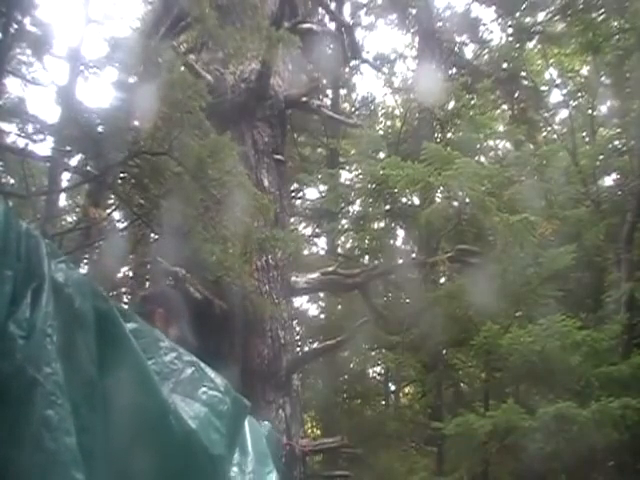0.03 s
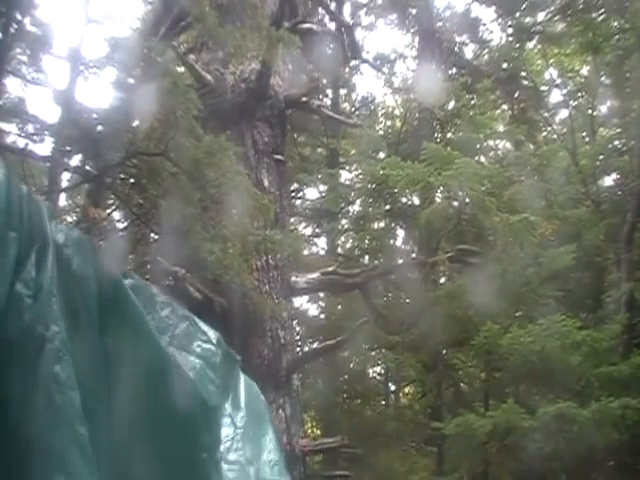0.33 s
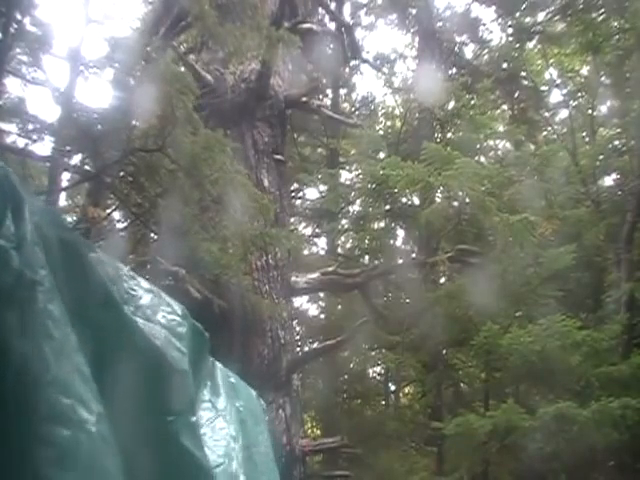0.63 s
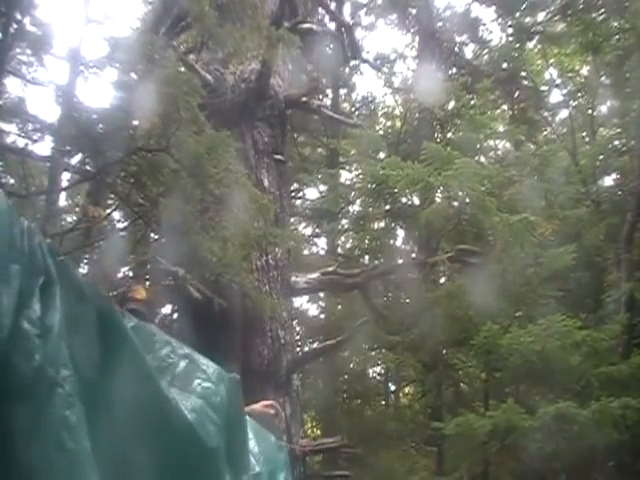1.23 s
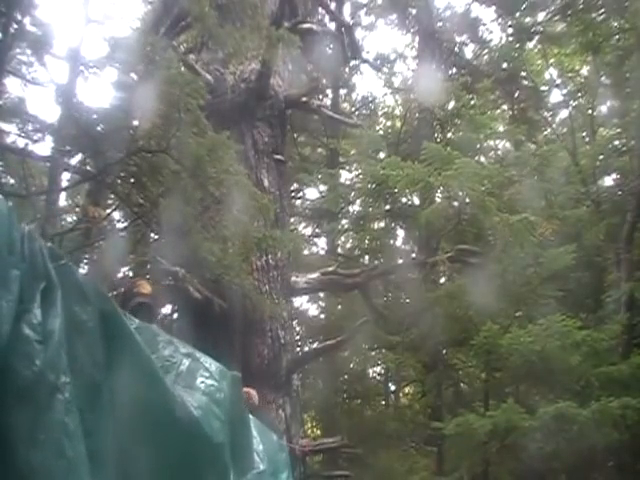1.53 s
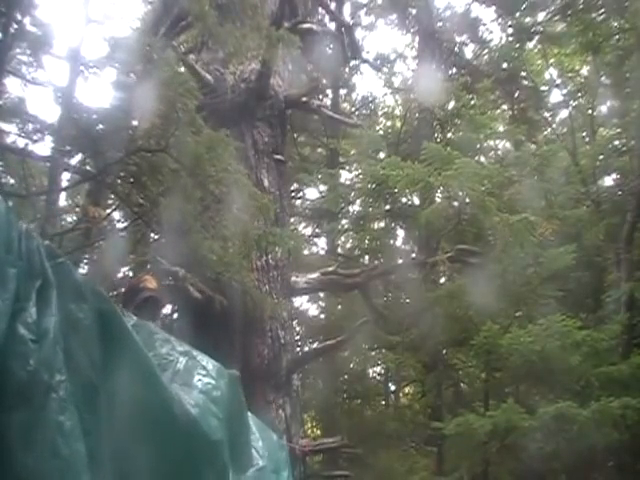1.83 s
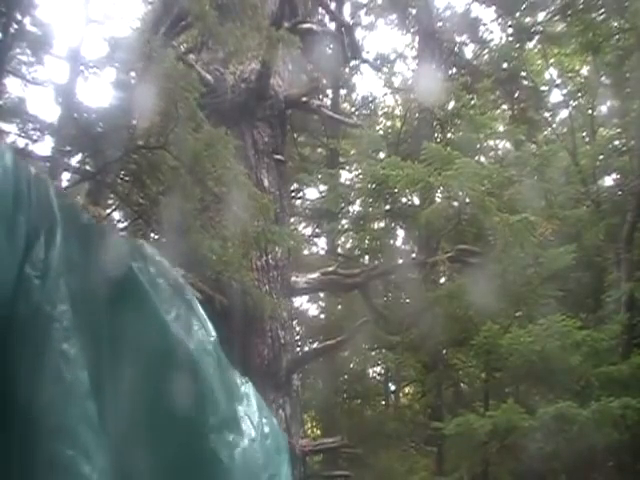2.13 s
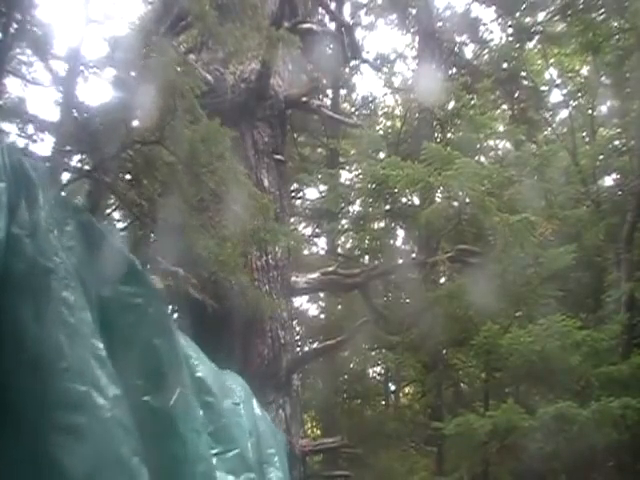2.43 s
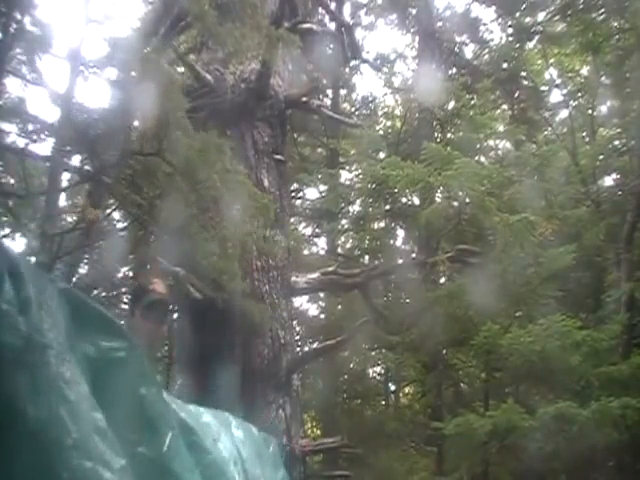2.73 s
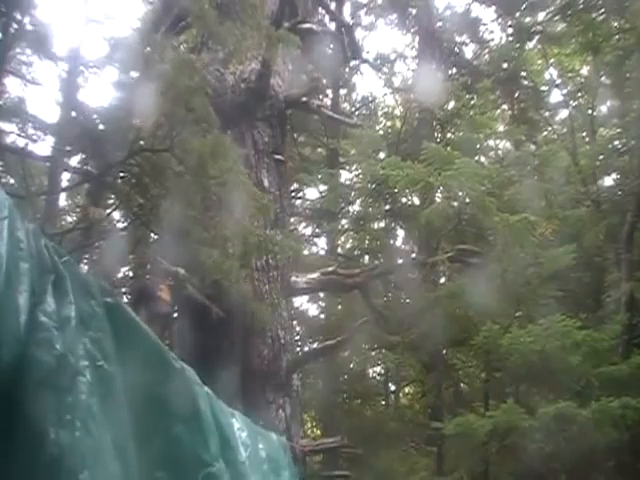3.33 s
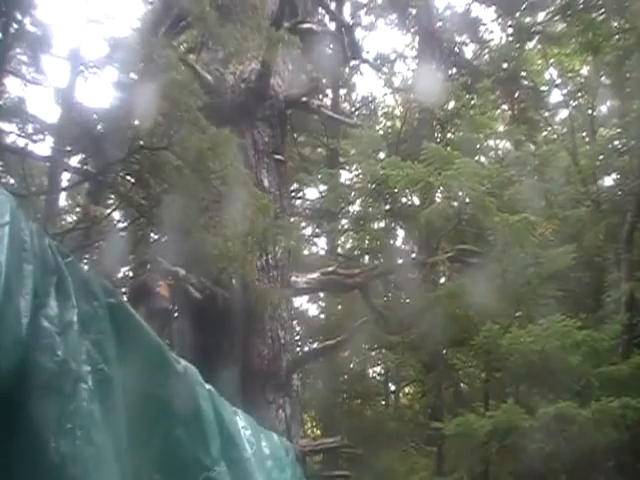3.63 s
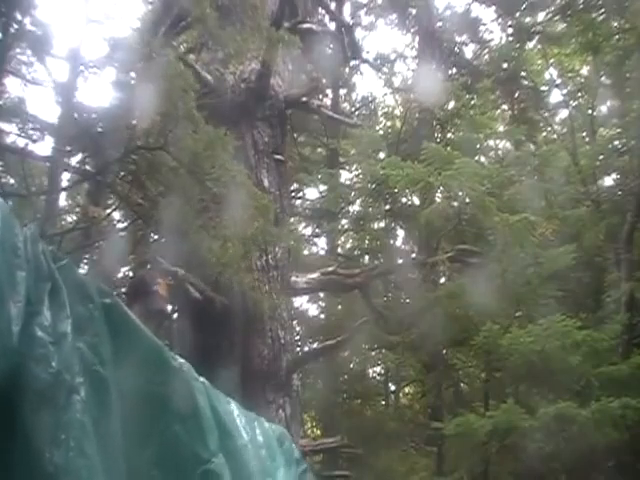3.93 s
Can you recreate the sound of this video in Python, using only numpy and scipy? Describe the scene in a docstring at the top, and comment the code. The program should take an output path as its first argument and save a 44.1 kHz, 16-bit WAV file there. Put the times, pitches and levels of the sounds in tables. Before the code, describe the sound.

A plastic tarp rustles and crinkles up close, with soft rain in the trees.

```python
"""A plastic tarp is pulled and shaken near the microphone in a wet forest, rain soft in the trees.
A drop taps the camera, then the sheet rubs and buckles in two swells, single folds snapping as they give.
Around 1.5 s the tarp rests and a drop thuds on the camera's shell. Two more swells follow from 2 s.
They die away after 3.2 s, the rubbing sheet squeaks once, another drop lands hard,
and the tarp stirs again at the very end."""
import sys
import numpy as np
from scipy import signal
from scipy.fft import rfft, irfft, next_fast_len
from scipy.io import wavfile
from scipy.ndimage import map_coordinates

SR = 44100
rng = np.random.default_rng(int(sys.argv[2]) if len(sys.argv) > 2 else 0)


def store_pcm(level_fs):
    """Save levels as 16-bit WAV."""
    pcm = np.round(np.clip(level_fs, -1, 1) * 32767).astype(np.int16)
    wavfile.write(sys.argv[1], SR, np.atleast_2d(pcm).T)


N = 176400

# Rain far off in the trees. Each row: frequency in Hz, relative level in dB.
RAIN_SPECTRUM = [(25, -26), (55, -20), (80, -8.5), (110, -12.5), (165, 1), (200, -6.5), (400, -3.5),
                 (850, 2), (1500, -10.5), (3000, -38), (5500, -43), (9500, -37), (16500, -39)]
# Drops on and beside the camera. Each row: start in seconds, then click, thud, ping and splash in dB.
CLOSE_DROPS = [(0.2401, -6, -26, -4.5, -34), (0.7875, -34, -50, -15.5, -47), (1.0949, -20, -45, -12, -25),
               (1.4701, -27, -55, -26, -35.5), (1.5721, -9, -11.5, -44, -21.5),
               (2.1964, -20, -47, -9.5, -40), (2.7711, -15, -47, -24, -38), (2.9337, -16, -45, -17, -43),
               (3.4157, -30, -55, -25, -42), (3.7018, -4.5, -22.5, -14, -16), (3.906, -31, -52, -18, -32)]
# The shell's low thud and high ping. Each row: frequency in Hz, level in dB, 60 dB decay in seconds.
THUD_MODES = [(280, -12, 0.011), (608, -1, 0.016), (760, 5.5, 0.0055), (1520, -5.5, 0.017),
              (1890, -3, 0.0091)]
PING_MODES = [(7100, -2, .004), (9200, -4, .005), (9620, -4.5, 0.01), (11900, 2, 0.001)]
# A close drop's impact and its splash. Each row: frequency in Hz, relative level in dB.
CLICK_SPECTRUM = [(60, -22), (300, 17), (2000, 15), (5000, 3), (10000, 7), (14000, -13), (16500, -26)]
SPLASH_SPECTRUM = [(60, -30), (300, 6), (2000, 1.5), (4500, 4.5), (6000, -0.5), (10000, -1), (13000, -7),
                   (16000, -27)]
# How hard the tarp moves. Each row: time in seconds, rustle level in dB, hiss level in dB.
TARP_MOTION = [(0.0, -32.5, -43), (0.04, -36, -44), (0.09, -31.5, -39), (0.29, -32, -36.5),
               (0.35, -25, -33), (0.48, -25, -31.0), (0.6, -27.5, -33.3), (0.67, -30.5, -34),
               (0.77, -29.5, -35.3), (0.86, -24.5, -33), (0.99, -26, -30.1), (1.08, -31, -33),
               (1.22, -29.5, -40), (1.37, -34.5, -45), (1.49, -44, -51.4), (1.55, -41, -50.5),
               (1.75, -50, -52.7), (1.848, -29.5, -40), (1.91, -37.5, -43), (1.97, -32, -41),
               (2.05, -24.5, -29.5), (2.15, -23.5, -28.5), (2.27, -27.5, -29.5), (2.35, -32, -35.5),
               (2.45, -33, -40.5), (2.55, -30.5, -36), (2.63, -32.5, -36.3), (2.74, -27.5, -32),
               (2.87, -25.5, -32.6), (2.98, -28.5, -36.5), (3.12, -28, -36.5), (3.25, -38.5, -43.5),
               (3.38, -37.5, -50), (3.45, -46, -52.5), (3.62, -44.5, -46.3), (3.83, -46.5, -53),
               (3.91, -35.5, -47), (4.0, -31.8, -36)]
# The sounds of the plastic, heard close. Each row: frequency in Hz, relative level in dB.
CRINKLE_SPECTRUM = [(500, -34), (3000, -6), (6000, -12), (9600, 5), (12000, -2), (14500, -12), (16000, -13)]
RUSTLE_SPECTRUM = [(30, -49), (80, -30), (150, -17.5), (300, -4), (700, 1), (1100, -0.5), (1800, 1),
                   (2500, -2), (3600, -3.5), (4400, -12), (6000, -13.5), (10000, -12), (16000, -66)]
HISS_SPECTRUM = [(1500, -54), (4000, 3), (5500, -6.5), (6800, 1), (8500, -1.5), (9650, 2.5), (10600, -3.5),
                 (12000, -7), (14500, -12), (16500, -30)]
CRACKLE_SPECTRUM = [(60, -52), (300, -19), (900, 0.5), (2000, 0), (3500, 0.5), (5200, -10.5), (7000, -7),
                    (9700, -5), (12000, -14.5), (16000, -45)]
# Folds that snap, and one thin high squeak of the sheet rubbing at 3.52 s. Each row: start in seconds,
# level in dB, rise in seconds, 60 dB decay in seconds, resonant pitch in Hz, its lift in dB.
FOLDS_AND_SQUEAK = [(0.057, -25.5, 0.0027, 0.059, 1640, 7), (.131, -21, 0.00059, 0.025, 1700, 12),
                    (.1635, -25, 0.0005, 0.067, 1340, 6), (.58, -25.5, .004, 0.073, 2000, 4),
                    (0.785, -28, .002, 0.068, 3000, -1), (.844, -24, 0.0011, 0.048, 8800, 11),
                    (0.9872, -15.5, 0.0045, 0.033, 3800, 7), (.992, -18.5, 0.0012, 0.1, 600, 13),
                    (1.157, -21.5, .001, 0.019, 3670, 10), (1.218, -22.5, 0.00091, .025, 2000, 1),
                    (1.291, -26, 0.0015, 0.015, 3500, -10), (1.313, -30, 0.0034, 0.022, 990, 11),
                    (1.4434, -33, 0.00036, 0.012, 1770, 10), (1.6495, -25, 0.00012, 0.047, 3400, 5.5),
                    (1.721, -37, 0.0036, 0.043, 2390, 10), (1.773, -32.5, .001, 0.11, 1330, 17),
                    (1.852, -28, .002, 0.063, 2400, 10), (1.866, -19, 0.0037, .03, 1880, 11),
                    (1.928, -27, 0.0037, 0.083, 880, 12), (2.248, -17.5, .001, 0.029, 1120, 11),
                    (2.541, -22, 0.0013, .04, 7060, 4.5), (2.607, -25, 0.0027, 0.032, 1800, -11),
                    (2.706, -24, 0.0021, 0.13, 2000, 2), (2.844, -21.5, 0.013, 0.14, 1160, 11.5),
                    (2.77, -25, .001, .014, 13500, 26), (2.945, -29, .001, .012, 13500, 24),
                    (3.021, -25, 0.0024, 0.042, 2500, -15), (3.089, -22, 0.0038, 0.027, 1800, -10),
                    (3.13, -32, .001, .04, 13000, 17), (3.187, -35, .001, .015, 12000, 20),
                    (3.215, -27, 0.00071, 0.048, 12500, 13), (3.333, -23.5, 0.0023, 0.051, 2350, 2.5),
                    (3.341, -34, 0.0017, 0.036, 12000, 14), (3.369, -41, 0.0043, 0.045, 1300, 20),
                    (3.519, -43, 0.021, .06, 9400, 24), (3.602, -38, 0.0026, 0.033, 2000, 19),
                    (3.676, -39, 0.00077, 0.029, 4000, 7), (3.798, -33, 0.0014, 0.027, 1910, 11),
                    (3.887, -25, 0.001, 0.041, 1960, 10), (3.906, -32, .001, 0.051, 11100, 26),
                    (3.966, -25.5, 0.0016, 0.033, 3000, -10), (3.987, -24.5, .003, 0.029, 2000, 2)]


def amp(db):
    """Decibels to gain."""
    return 10 ** (np.asarray(db) / 20)


def unit(x):
    """Scale to rms 1."""
    return x / np.sqrt(np.mean(x ** 2) + 1e-20)


def colour(points, peak_hz=1000, peak_db=0, width_oct=0.23, size=2048):
    """Minimum-phase impulse response of energy 1 for a spectrum, with an optional resonance."""
    point_hz, point_db = np.transpose(points)
    hz = np.fft.rfftfreq(size, 1 / SR) + 1
    db = np.interp(np.log(hz), np.log(point_hz), point_db)
    db += peak_db * np.exp(-.5 * (np.log2(hz / peak_hz) / width_oct) ** 2)
    cepstrum = irfft(np.log(amp(db)))
    cepstrum[1:size // 2] *= 2
    cepstrum[size // 2 + 1:] = 0
    response = irfft(np.exp(rfft(cepstrum)))
    return response / np.linalg.norm(response)


def through(x, response):
    """Convolve and keep the length."""
    return signal.fftconvolve(x, response)[:len(x)]


def add(track, start, sound):
    """Mix a sound into a track at a start in seconds."""
    part = track[int(start * SR):][:len(sound)]
    part += sound[:len(part)]


def wobble(per_s):
    """A smooth random curve with per_s knots a second."""
    return map_coordinates(rng.standard_normal(4096), [np.arange(N) * per_s / SR], mode="wrap")


def impulses(per_s, spread_db, n=N):
    """Randomly timed impulses of scattered size and either sign, rms 1."""
    size = amp(spread_db * np.clip(rng.standard_normal(n), -2, 2)) * rng.choice([-1, 1], n)
    return unit(size * (rng.random(n) < per_s / SR))


def burst(t, rise, t60):
    """Straight rise, then exponential decay."""
    return np.minimum(t / rise, 1) * amp(-60 * np.maximum(t - rise, 0) / t60)


def ring(modes, t):
    """Damped modes struck together, alternating in sign."""
    return sum(amp(db - 60 * t / t60) * np.cos(2 * np.pi * hz * t) * (-1) ** k
               for k, (hz, db, t60) in enumerate(modes))


def distant_rain(level_db=-48):
    """Countless drops on far leaves reach the microphone as a soft wash."""
    gain = amp(level_db + 0.24 * wobble(12))
    return gain * through(impulses(per_s=4000, spread_db=1), colour(RAIN_SPECTRUM))


def trunk_scatter(near, level_db=-22.5):
    """The trunks around the microphone return a faint, short scatter of the near sounds."""
    t = np.arange(SR // 2) / SR
    tail = rng.standard_normal(len(t)) * burst(t, rise=0.0047, t60=0.086)
    return amp(level_db) * through(near, tail / np.linalg.norm(tail))


def close_drops(click_t60=0.001, low_cut_hz=196):
    """Right at the microphone, each drop clicks, rings the camera's shell and splashes."""
    out, t = np.zeros(N), np.arange(SR // 16) / SR
    for start, click_db, thud_db, ping_db, splash_db in CLOSE_DROPS:
        impact = rng.choice([-1, 1], len(t)) * amp(-60 * t / click_t60)
        click = amp(click_db) * through(impact / np.linalg.norm(impact), colour(CLICK_SPECTRUM))
        shell = amp(thud_db) * ring(THUD_MODES, t) + amp(ping_db) * ring(PING_MODES, t)
        spray = rng.standard_normal(len(t)) * burst(t, rise=0.00027, t60=0.021)
        splash = amp(splash_db) * through(spray, colour(SPLASH_SPECTRUM))
        add(out, start, click + shell + splash)
    # The small shell gives no bass.
    return signal.sosfilt(signal.butter(2, low_cut_hz, "highpass", fs=SR, output="sos"), out)


def tarp_motion():
    """The rustle and hiss levels of the moving tarp at every sample, in dB."""
    times, *levels = np.transpose(TARP_MOTION)
    return [np.interp(np.arange(N) / SR, times, db) for db in levels]


def coating_crinkles(t60=0.005):
    """The tarp's coating crinkles in sparse, bright ticks that follow the hiss of the sheet."""
    _, hiss_db = tarp_motion()
    t = np.arange(SR // 100) / SR
    power = through(impulses(per_s=140, spread_db=3.5) ** 2, amp(-60 * t / t60) ** 2)
    ticks = np.sqrt(np.abs(power)) * rng.standard_normal(N)
    return unit(through(ticks, colour(CRINKLE_SPECTRUM))) * amp(hiss_db - 10)


def folds_and_squeak(snap_db=10.5, ring_cycles=2.7, sudden_s=0.00052):
    """Folds give with a snap and an avalanche of buckles that ring the panel; one slow rub squeaks."""
    out, t = np.zeros(N), np.arange(SR // 8) / SR
    for start, db, rise, t60, hz, lift_db in FOLDS_AND_SQUEAK:
        drive = impulses(per_s=8000, spread_db=2.5, n=len(t)) * burst(t, rise, t60)
        panel = through(drive, colour(CRACKLE_SPECTRUM, hz, lift_db))
        snap_gain = amp(snap_db) * np.exp(-rise / sudden_s)  # the snap fades for slow rises
        snap = snap_gain * np.exp(-hz * t / ring_cycles) * np.cos(2 * np.pi * hz * t)
        add(out, start, amp(db) * (snap + panel))
    return out


def tarp_sheet(creases_per_s=130, crease_t60=0.014):
    """Near the microphone, dense tiny buckles rustle and hiss; larger creases crackle among them."""
    rustle_db, hiss_db = tarp_motion()
    flutter_db = .8 * wobble(45)
    rustle = through(impulses(per_s=7000, spread_db=3.5), colour(RUSTLE_SPECTRUM))
    rustle *= amp(rustle_db - 1 + flutter_db + 1.14 * wobble(160))
    hiss = through(impulses(per_s=22000, spread_db=3.5), colour(HISS_SPECTRUM))
    hiss *= amp(hiss_db - 1.5 + flutter_db + 1.5 * wobble(260))
    crackle, t = np.zeros(N), np.arange(SR // 20) / SR
    pitches_hz = np.geomspace(800, 10000, 12)
    for hz in pitches_hz:
        crack = rng.standard_normal(len(t)) * amp(-60 * t / crease_t60)
        crack[0] += 4  # sharp leading edge
        crease = through(crack, colour(CRACKLE_SPECTRUM, hz, peak_db=10))
        onsets = impulses(creases_per_s / len(pitches_hz), spread_db=6)
        crackle += through(onsets, crease / np.linalg.norm(crease))
    return rustle + hiss + unit(crackle) * amp(rustle_db - 9.5)


def scene():
    """One microphone among the trees: tarp and drops close up, rain in the distance."""
    near = tarp_sheet() + coating_crinkles() + folds_and_squeak() + close_drops()
    return (near + trunk_scatter(near) + distant_rain())[None]


def record(dry, top_hz=16000):
    """The camera keeps nothing above its band limit."""
    size = next_fast_len(N + SR // 2)
    passband = np.fft.rfftfreq(size, 1 / SR) < top_hz
    return irfft(rfft(dry, size) * passband, size)[..., :N]


dry = scene()
out = record(dry)
store_pcm(out)
```